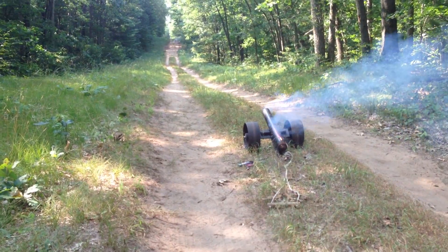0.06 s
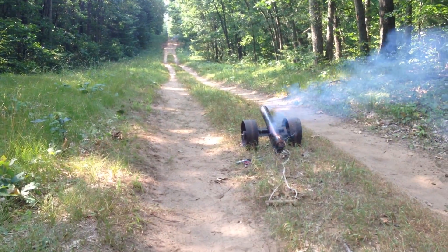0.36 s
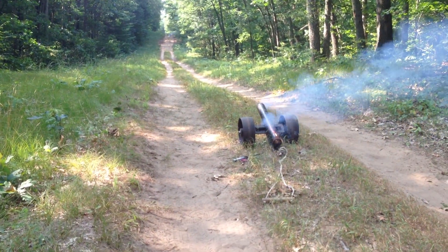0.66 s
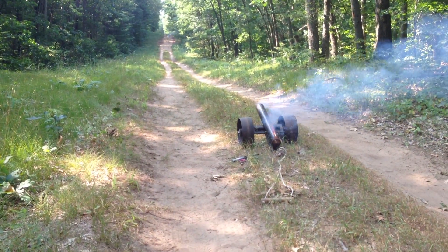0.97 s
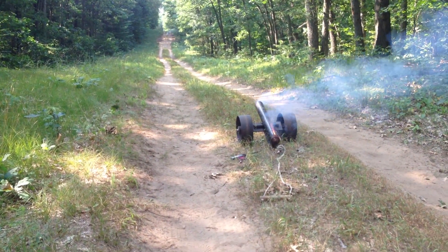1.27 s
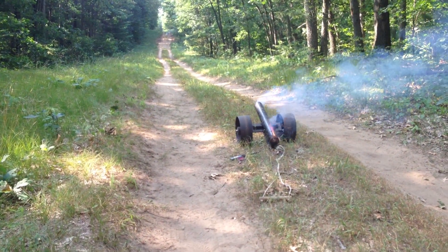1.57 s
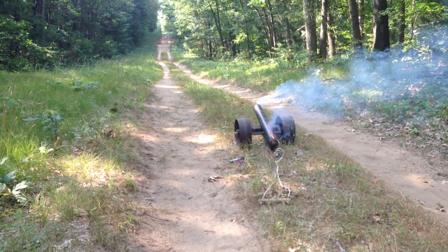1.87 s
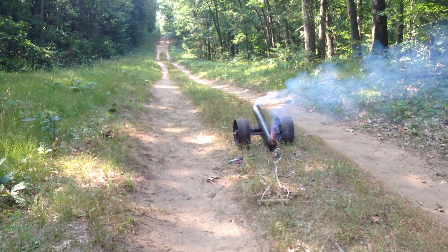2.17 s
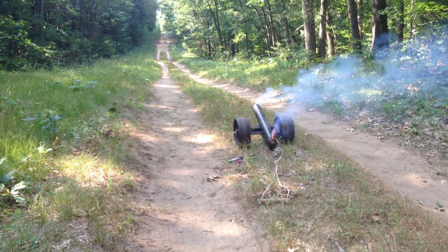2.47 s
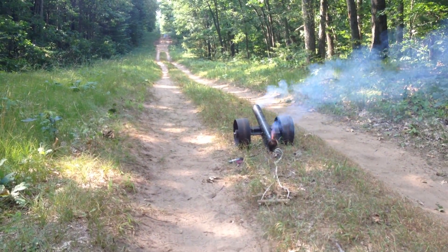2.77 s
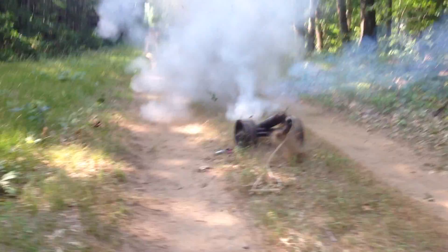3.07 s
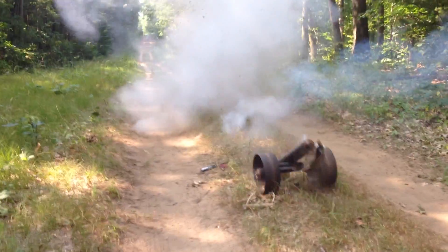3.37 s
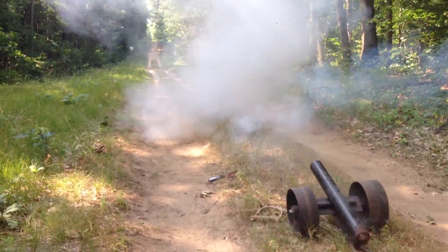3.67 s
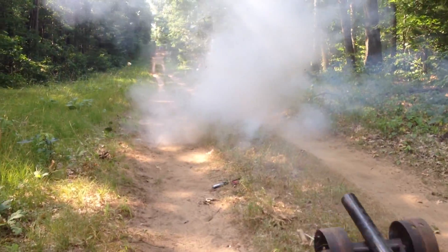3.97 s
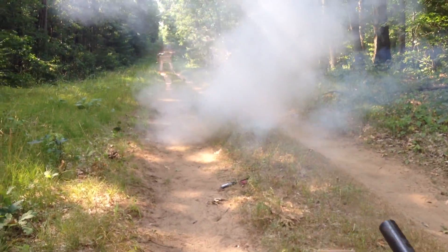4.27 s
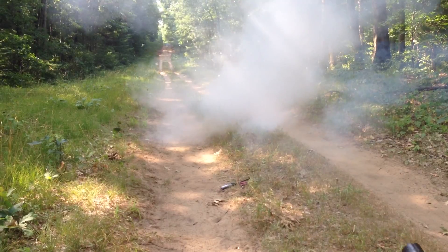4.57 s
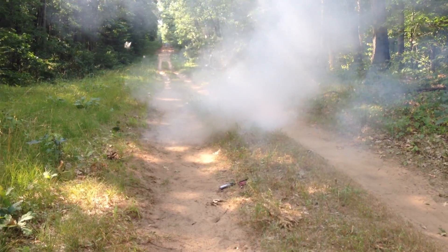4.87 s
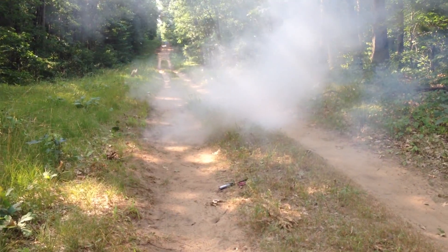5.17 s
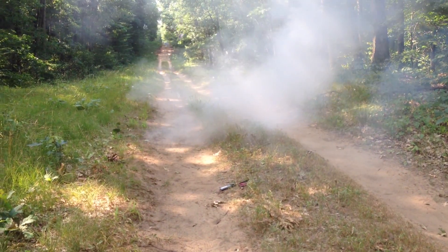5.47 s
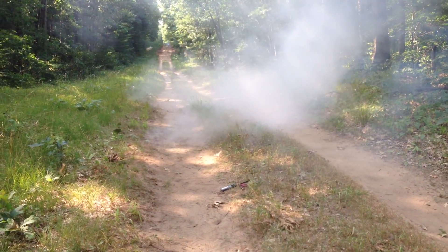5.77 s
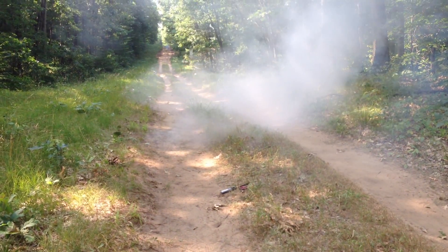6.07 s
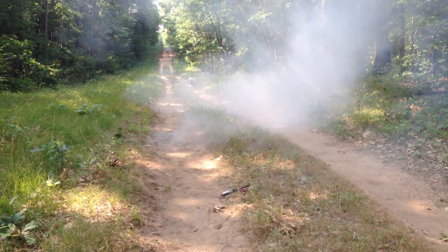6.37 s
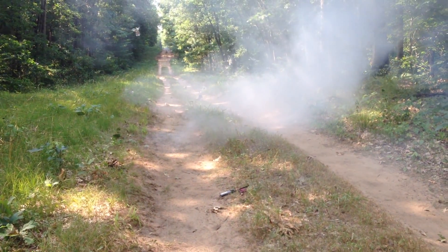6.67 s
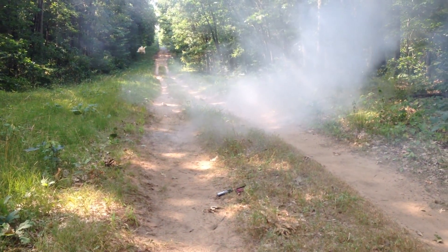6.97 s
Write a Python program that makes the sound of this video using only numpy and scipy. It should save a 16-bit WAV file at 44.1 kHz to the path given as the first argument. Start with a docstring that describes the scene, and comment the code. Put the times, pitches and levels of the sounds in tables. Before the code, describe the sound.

A fuse sputters and hisses faintly in quiet woods. A small cannon fires with a loud blast that overloads the small microphone and rolls away among the trees. Its iron carriage lands with a ringing clang and rattles to rest in the grass, while bits of grit tick on leaves. After a lull, a sharp explosion cracks from far away with its own echo.

```python
"""Black-powder cannon in the woods

On a dirt track a fuse hisses, a small cannon fires, and the trees scatter the blast. The iron carriage
tumbles back, lands with a clang and rattles to rest in the grass. Seconds later a sharp explosion
arrives from far down the range with its own echo. One small microphone, overloaded by the loudest peaks."""
import sys
import numpy as np
from scipy import signal
from scipy.fft import rfft, irfft
from scipy.io import wavfile

SR = 44100
rng = np.random.default_rng(int(sys.argv[2]) if len(sys.argv) > 2 else 0)


def master_out(mix):
    """Clip the mix to full scale and print it as 16-bit PCM to the path in sys.argv[1]."""
    frames = np.transpose(np.atleast_2d(mix))
    ceiling = np.clip(frames, -1, 1)
    pcm = np.round(ceiling * 32767).astype(np.int16)
    wavfile.write(sys.argv[1], SR, pcm)


N = 318578
TIME = np.arange(N) / SR
AROUND = np.arange(-SR // 20, SR // 4) / SR   # seconds either side of a short event's peak

# Pressure waves of the cannon, then the far explosion. Each row: arrival in seconds, shock height in dB,
# shock length in seconds, boom level in dB, boom pitch in Hz, boom t60 in seconds.
SHOCKS = [(2.983, -12, .0012, -4, 333, .022), (6.8129, 0, 0.00049, -7.5, 211.4, 0.028)]
# The overloaded muzzle roar, and the faint tick. Each row: frequency in Hz, relative density in dB.
ROAR_COLOUR = [(40, -30.5), (110, -18.5), (170, -8.5), (300, -5.5), (620, 2), (1200, -3.5), (2200, -1),
               (3300, 2), (5000, -1), (8000, -4), (15500, -12.5)]


def cannon():
    """The touch hole flares, the muzzle roars and the woods roll on."""
    # The echo as it sets in. Each row: frequency in Hz, relative density in dB.
    echo_colour = [(40, -36), (105, -24.5), (170, -1.5), (215, 3.5), (265, 0), (330, 3.5), (425, -7),
                   (600, -1), (800, -2), (1700, -0.5), (2200, -1), (3300, 1), (6000, -0.5), (10000, -7.5),
                   (15500, -13)]
    roar_s, landing_s = 2.991, 3.715
    flare = envelope(2.974, level_db=-25.5, attack_db_per_s=1300, hold_s=0, fade_db_per_s=90)
    muzzle = envelope(roar_s, level_db=-8.5, attack_db_per_s=1700, hold_s=.025, fade_db_per_s=90)
    roar = np.hypot(flare, muzzle) * colour(grains(spread_db=1.5), ROAR_COLOUR)
    # The echo fades slowly, drops as the carriage lands and fades faster from then on.
    late = since(landing_s)
    early = since(roar_s) - late
    echo_db = -17.5 - 8.5 * early - 9.5 * np.tanh(late / .05) - 12.5 * late
    return roar + woods(roar_s, echo_db, echo_colour, rise_s=.04, bass_cycles=17, patchy_db=.93)


def shocks():
    """Each explosion arrives as an N-shaped shock and a few cycles of boom."""
    out = np.zeros(N)
    for s, shock_db, length, boom_db, boom_hz, t60 in SHOCKS:
        age = since(s)
        out += from_db(shock_db) * (1 - 2 * age / length) * ((age > 0) & (age < length))
        out += from_db(boom_db - 60 * age / t60) * np.sin(2 * np.pi * boom_hz * age)
    return out


def far_explosion():
    """A faint tick and a short rasp are heard just before the distant crack, then the woods answer."""
    # The echo as it sets in, and the rasp. Each row: frequency in Hz, relative density in dB.
    echo_colour = [(40, -37), (105, -26), (165, -5.5), (215, 0.5), (330, 3.5), (430, 1), (550, 1),
                   (900, -2), (1800, -4), (2500, -7.5), (5800, -15), (9000, -27.5), (15500, -45)]
    rasp_colour = [(100, -17), (170, 6.5), (260, -3.5), (410, 5), (800, -16), (1900, -18), (2600, -3.5),
                   (3200, -6.5), (3800, -57), (6000, -49)]
    crack_s = SHOCKS[1][0]
    age = since(crack_s)
    scatter_db = 16 * np.exp(-age / .0061)   # extra scatter right behind the crack
    echo_db = -30.5 - 16.5 * age + scatter_db
    out = woods(crack_s, echo_db, echo_colour, rise_s=.00061, bass_cycles=.6, patchy_db=.54)
    rasp = colour(grains(0, count=len(AROUND)), rasp_colour) * swell(rise_s=.0047, fall_s=.0046)
    add(out, 6.811, from_db(-9.5) * rasp)
    tick = grains(0, count=len(AROUND)) * swell(rise_s=.0002, fall_s=.00091)
    add(out, 6.7902, from_db(-39) * colour(tick, ROAR_COLOUR))
    return out


def woods(start_s, level_db, spectrum, rise_s, bass_cycles, patchy_db):
    """Countless trunks return a blast: bass builds last; later echoes travel farther and lose treble."""
    # Loss in air and foliage. Each row: frequency in Hz, loss in dB per second (negative counts as none).
    absorption = [(100, 1), (200, 2.5), (320, -1.5), (600, 2), (1000, 5), (1800, 9), (2800, 27),
                  (4200, 36.5), (6000, 50.5), (9000, 66), (15000, 95.5)]
    # Stands of trees that send back a louder roll.
    # Each row: time in seconds, lift in dB, half-width in seconds, centre in Hz.
    rolls = [(3.075, 5, 0.011, 496), (3.145, 4, 0.008, 420), (3.195, 3.5, 0.0078, 240),
             (3.365, 4.5, 0.0088, 330), (3.52, 3.5, 0.018, 298), (3.68, 4.5, 0.035, 194),
             (4.0, 4.5, .04, 300), (6.915, 6, 0.016, 320), (6.962, 8.5, 0.0049, 280),
             (7.035, 4, 0.018, 350), (7.15, 5, 0.0065, 352)]
    roll_spread_octaves = 1.1
    edges = 30 * 2 ** (np.arange(28) / 3)   # third-octave bands
    centres = np.sqrt(edges[1:] * edges[:-1])
    gains = from_db(at_hz(spectrum, centres)) * np.sqrt(np.diff(edges))
    gains /= np.linalg.norm(gains[(centres > 130) & (centres < 1000)])
    first, out = round(start_s * SR), np.zeros(N)
    age = TIME[:N - first]
    echoes = [grains(spread_db=2.0)[first:], grains(spread_db=2.5)[first:]]
    rolls_db = np.array([db * bump(s, width)[first:] for s, db, width, _ in rolls])
    roll_hz = np.array(rolls)[:, -1]
    for k, hz in enumerate(centres):
        bandpass = signal.butter(4, edges[k:k + 2], "band", fs=SR, output="sos")
        band = rms_one(signal.sosfilt(bandpass, echoes[k % 2]))
        build_up = np.tanh(age / (rise_s + bass_cycles / hz))
        roll_share = np.exp(-.5 * (np.log2(hz / roll_hz) / roll_spread_octaves) ** 2)
        band_db = roll_share @ rolls_db - max(at_hz(absorption, hz), 0) * age
        out[first:] += gains[k] * band * build_up * from_db(band_db)
    return out * from_db(level_db + patchy_db * drift(90))


def carriage():
    """Every blow is a flurry of contacts between loose iron parts, which leaves the wheels ringing."""
    # Blows as it tumbles. Each row: time in seconds, relative level in dB, build-up and die-away
    # in seconds, treble cutoff in Hz, clean strike in dB relative to that level.
    blows = [(3.7243, -16, 0.00058, 0.0051, 17000, -22), (3.733, -11, 0.0047, 0.0097, 11100, -3),
             (3.770, -28, 0.014, 0.041, 14000, -19), (3.83, -31, 0.0052, 0.0073, 12000, -2),
             (3.884, -35, .004, 0.028, 6000, -1), (3.943, -22, 0.0027, 0.01, 4970, -4),
             (3.9993, -24.5, 0.0014, 0.0052, 4800, 1.5), (4.092, -26.5, 0.0013, 0.0085, 4260, -12),
             (4.132, -29.5, 0.0056, 0.013, 6200, -20), (4.173, -40, 0.0043, .008, 5500, -2),
             (4.240, -39, 0.00088, 0.01, 8000, -10), (4.35, -45, .004, 0.0063, 3000, -10),
             (4.408, -39, 0.0032, 0.0076, 1790, -16), (4.538, -35, 0.0048, 0.0044, 3260, -2.5),
             (4.965, -31.5, 0.0043, 0.0044, 2900, -2)]
    # Modes of the iron wheels and barrel. Each row: pitch in Hz, relative level in dB, t60 in seconds.
    iron_modes = [(1020, -6.5, 0.31), (1210, -19, 0.27), (1460, -6, 0.13), (1670, -4.5, 0.3),
                  (1788, 7.5, 0.21), (1865, 0.5, 0.11), (2365, -6.5, 0.428), (2960, 5.5, 0.15),
                  (3300, -3, 0.19), (3430, -20, .15), (4045, -7.5, 0.45), (4500, 2, 0.2),
                  (5350, -7.5, 0.19), (5910, -4.5, 0.16), (7110, -10, 0.2), (7440, -6.5, 0.34),
                  (8000, -9, 0.32), (8446, -7.5, 0.3), (9900, -14.5, .3), (11230, -14, .18),
                  (11880, -15.5, .25)]
    # The clatter of loose parts. Each row: frequency in Hz, relative density in dB.
    clatter_colour = [(120, -31.5), (250, -21.5), (600, -9.5), (1000, -2.5), (1350, -7), (1800, 4.5),
                      (2250, -13), (2900, 0), (4300, -1.5), (5100, -10), (8000, -11), (10500, -16.5),
                      (15500, -17)]
    contacts, strikes = np.zeros(N), np.zeros(N)
    for s, db, rise, fall, bright_hz, strike_db in blows:
        soften = signal.butter(2, min(bright_hz, SR / 2.2), fs=SR, output="sos")
        flurry = from_db(db) * grains(spread_db=2.5, count=len(AROUND)) * swell(rise, fall)
        strike = from_db(db + strike_db) * (AROUND == 0) + 1e-18
        add(contacts, s, signal.sosfilt(soften, flurry))
        add(strikes, s, signal.sosfilt(soften, strike))
    clatter = from_db(1.5) * contacts + from_db(-1) * small_parts(contacts, t60=.093)
    drive = from_db(-14.5) * strikes + from_db(-47.5) * contacts
    body = sum(from_db(db) * ring(drive, hz, t60) for hz, db, t60 in iron_modes)
    return colour(clatter, clatter_colour) + body + wheel_rims(landing_s=blows[1][0])


def small_parts(contacts, t60, count=170):
    """Axle, bolts and brackets answer the contacts with a thicket of short resonances."""
    age = TIME[:SR // 4]
    pitches = 800 * 18 ** rng.random((count, 1))
    phases = 2 * np.pi * rng.random((count, 1))
    modes = np.sqrt(pitches) * np.sin(2 * np.pi * pitches * age + phases)
    response = modes.sum(axis=0) * from_db(-60 * age / t60)
    return signal.oaconvolve(contacts, response / np.linalg.norm(response))[:N]


def wheel_rims(landing_s):
    """The landing sets both rims singing; they waver as the wheels turn, until the sand damps them."""
    # Two clear notes, each a beating pair. Each row: pitch in Hz, starting level in dB, t60 in seconds.
    rim_modes = [(2328, -28, 1.25), (2350, -34.5, .8), (3910, -33, 2.27), (3886, -36, 0.72)]
    waver_db, settle_s, settle_db_per_s = 3, 4.24, 85
    age = since(landing_s)
    notes = np.zeros(N)
    for hz, db, t60 in rim_modes:
        notes += from_db(db + waver_db * drift(31) - 60 * age / t60) * np.sin(2 * np.pi * hz * age)
    return notes * from_db(-settle_db_per_s * since(settle_s))


def fuse():
    """Powder sputters and spurts; a brighter jet swells as the flame enters the touch hole."""
    # Spurts of flame. Each row: time in seconds, level in dB, half-width in seconds.
    spurt_events = [(.62, -58, 0.026), (.81, -52, 0.11), (1.21, -54.5, 0.15), (1.57, -61, 0.08),
                    (1.99, -54, 0.21), (2.44, -52.5, .055)]
    # The three sounds of burning powder. Each row: frequency in Hz, relative density in dB.
    sputter_colour = [(350, -14), (680, -1.5), (950, -8.5), (1300, -3.5), (2000, -1), (2450, 0), (2800, -8),
                      (3200, -0.5), (4200, -1.5), (6200, -7.5), (10000, -11.5), (15500, -18.5)]
    spurt_colour = [(1000, -17.5), (1400, -11.5), (2400, -6), (2800, -14), (3200, -1), (4400, -2),
                    (6200, -9.5), (15500, -19)]
    jet_colour = [(5500, -26), (7200, -9), (8200, 0.5), (9800, -3.5), (11800, 0), (13500, -2.5),
                  (15500, -6.5)]
    muffle_db = 5.5 * since(2.45)   # the flame is inside the touch hole
    sputter = from_db(-54 - muffle_db + .6 * drift(30)) * colour(grains(spread_db=1.5), sputter_colour)
    spurt_gain = sum(from_db(db) * bump(s, width) for s, db, width in spurt_events)
    spurts = spurt_gain * colour(grains(spread_db=1.5), spurt_colour)
    jet_db = -62.5 + 13.5 * bump(2.55, width_s=.48)
    jet = from_db(jet_db + .6 * drift(25)) * colour(grains(spread_db=1.0), jet_colour)
    shot_s = SHOCKS[0][0]
    return (sputter + spurts + jet) * (TIME < shot_s)


def grass():
    """Grass crackles under the wheels as the carriage rolls back and slows down."""
    # Wheels scuffing through tufts. Each row: time in seconds, lift in dB, half-width in seconds.
    scuffs = [(3.552, 18, 0.016), (4.39, 4, 0.077), (4.78, 3.5, 0.038)]
    # The crackle. Each row: frequency in Hz, relative density in dB.
    grass_colour = [(1200, -4.5), (3000, 0.5), (4200, 3.5), (7500, -1), (11000, -6), (15500, -6)]
    rolling = envelope(3.61, level_db=-57.5, attack_db_per_s=90, hold_s=.88, fade_db_per_s=13)
    scuff_db = sum(db * bump(s, width) for s, db, width in scuffs)
    return rolling * from_db(scuff_db + 1.3 * drift(35)) * colour(grains(spread_db=2.5), grass_colour)


def grit():
    """Thrown grit ticks as it drops on leaves."""
    # Falling grains. Each row: time in seconds, relative level in dB.
    drops = [(4.319, -35.5), (4.7182, -39.5), (4.9371, -42), (5.3932, -43), (5.4894, -46), (5.582, -36),
             (6.1409, -45), (6.4058, -46)]
    # The tick of a leaf. Each row: frequency in Hz, relative density in dB.
    leaf_colour = [(1500, -31), (3500, 4), (7500, 2), (10000, 3), (15500, -18)]
    ticks = np.zeros(N)
    for s, db in drops:
        tick = grains(0, count=len(AROUND)) * swell(rise_s=.00032, fall_s=.0018)
        add(ticks, s, from_db(db - 9) * tick)
    return colour(ticks, leaf_colour)


def air():
    """The quiet background of the woods sinks after each explosion and creeps back."""
    # A low hush. Each row: frequency in Hz, relative density in dB.
    air_colour = [(30, -39), (65, -24), (110, -10), (190, 2), (280, 1), (420, -10.5), (650, -13.5),
                  (900, -21), (2200, -22.5), (4000, -20), (9000, -23), (15500, -23.5)]
    depth_db, rise_db_per_s = 12, 6
    sink_db = sum((TIME > s) * np.maximum(depth_db - rise_db_per_s * since(s), 0) for s, *_ in SHOCKS)
    return from_db(-59.8 - sink_db) * colour(rng.standard_normal(N), air_colour)


def from_db(db):
    """Decibels as an amplitude gain."""
    return np.exp(np.asarray(db) * (np.log(10) / 20))


def rms_one(x):
    """Scale to an rms of 1."""
    return x / np.sqrt(np.mean(x ** 2) + 1e-20)


def at_hz(points, hz):
    """A spectrum read on a log-frequency axis."""
    f, value = np.transpose(points)
    return np.interp(np.log(np.maximum(hz, 1)), np.log(f), value)


def drift(knots_per_s):
    """A random wander with rms 1."""
    knots = rng.standard_normal(4096)
    return rms_one(np.interp(TIME * knots_per_s, np.arange(len(knots)), knots))


def colour(x, spectrum, size=4096):
    """Causal (minimum-phase) filter that leaves the power of white noise unchanged."""
    gain = rms_one(from_db(at_hz(spectrum, np.arange(size // 2 + 1) * SR / size)))
    cepstrum = irfft(np.log(gain))
    cepstrum[1:size // 2] *= 2
    cepstrum[size // 2 + 1:] = 0
    return signal.oaconvolve(x, irfft(np.exp(rfft(cepstrum))))[:len(x)]


def grains(spread_db, count=N, size=16):
    """Dense clicks of uneven size with rms 1; no spread gives plain white noise."""
    clumps = count // size + 1
    noise = rng.standard_normal((clumps, size))
    gains = from_db(spread_db * rng.standard_normal((clumps, 1)))
    return rms_one((noise * gains).ravel()[:count])


def ring(clicks, hz, t60):
    """A unit click sets a sine of height 1 ringing."""
    r, w = np.exp(-np.log(1000) / (t60 * SR)), 2 * np.pi * hz / SR
    return signal.lfilter([0, np.sin(w)], [1, -2 * r * np.cos(w), r * r], clicks + 1e-18)


def swell(rise_s, fall_s):
    """Envelope around an event: it builds up to 1 and dies away."""
    return np.exp(np.maximum(np.minimum(AROUND / rise_s, -AROUND / fall_s), -40))


def bump(s, width_s):
    """A smooth rise to 1 and fall around time s."""
    return np.exp(-.5 * np.minimum(((TIME - s) / width_s) ** 2, 100))


def since(s):
    """Seconds after time s, zero before it."""
    return np.maximum(TIME - s, 0)


def envelope(s, level_db, attack_db_per_s, hold_s, fade_db_per_s):
    """Gain that reaches its level at time s, holds and fades."""
    before = np.clip(s - TIME, 0, 1)
    return from_db(level_db - attack_db_per_s * before - fade_db_per_s * since(s + hold_s))


def add(track, s, sound):
    """Lay an event's sound into a track, its peak at time s."""
    start = round((s + AROUND[0]) * SR)
    track[start:start + len(sound)] += sound[:N - start]


def scene():
    """All sources in mono over the quiet air of the woods."""
    return (fuse() + shocks() + cannon() + carriage() + far_explosion() + grass() + grit() + air())[None]


def record(dry):
    """A small microphone thins the bass, the loudest peaks are flattened and the top is cut."""
    low_cut_hz, top_hz = 81, 15500
    thin = signal.sosfilt(signal.butter(1, low_cut_hz, "high", fs=SR, output="sos"), dry)
    clipped = thin / (1 + thin ** 4) ** (1 / 4)
    return signal.sosfilt(signal.ellip(10, .2, 70, top_hz, fs=SR, output="sos"), clipped)


dry = scene()
out = record(dry)
master_out(out)
```